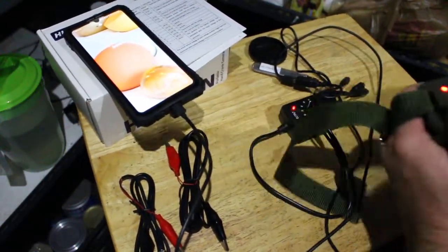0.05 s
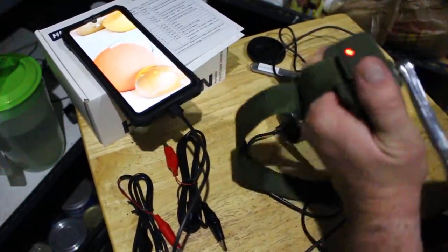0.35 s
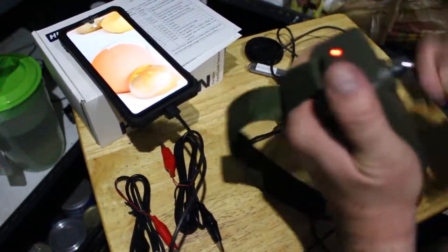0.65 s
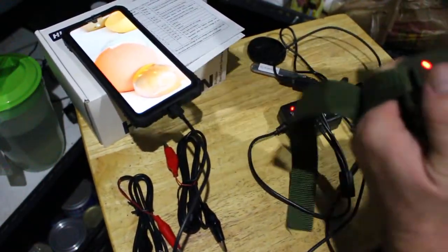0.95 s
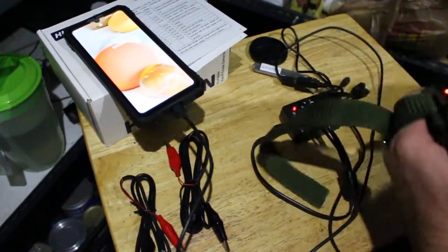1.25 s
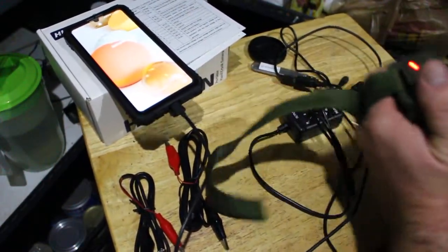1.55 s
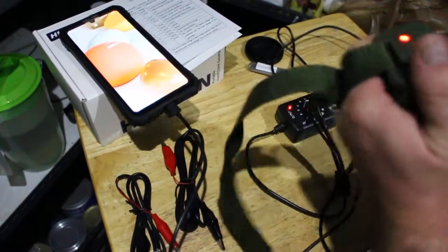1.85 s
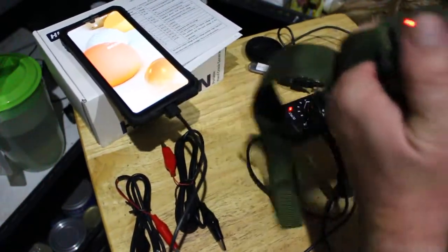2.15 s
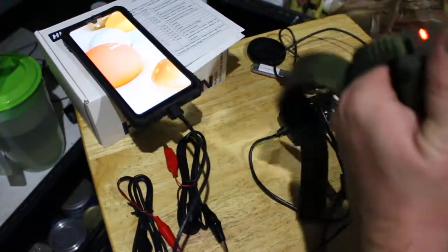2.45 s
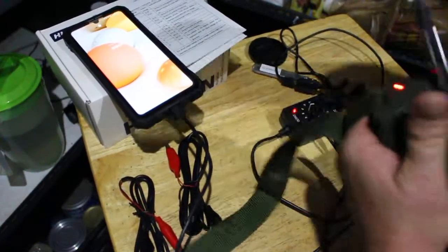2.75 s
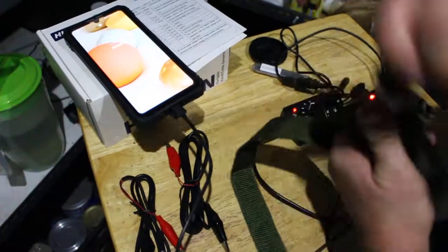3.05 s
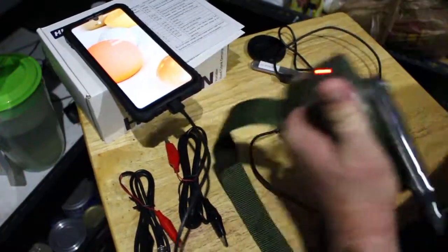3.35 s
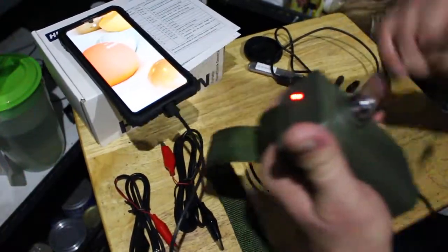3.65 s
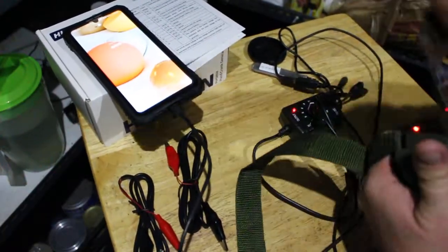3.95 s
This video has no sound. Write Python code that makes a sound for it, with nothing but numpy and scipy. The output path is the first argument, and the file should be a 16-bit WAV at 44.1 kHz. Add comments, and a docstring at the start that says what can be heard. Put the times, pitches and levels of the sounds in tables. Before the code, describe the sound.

A hand-cranked generator whirs and rattles, its gear whine rising and falling with each turn.

```python
"""A small room, a wooden table, a hand-held crank generator turned over it close to a stereo microphone.
Each push speeds the gears up: the meshing teeth whine and rattle in the casing, squeal briefly, mostly
as they coast, and go slack between pushes. Underneath lie a faint drone, a steady room hum and one soft
bump of the casing. The generator sits a little to the right, with quick reflections off the table."""
import sys
import numpy as np
from scipy import signal
from scipy.fft import rfft, irfft
from scipy.io import wavfile

SR = 44100
rng = np.random.default_rng(int(sys.argv[2]) if len(sys.argv) > 2 else 0)


def output_pcm(signal):
    """Save a mono or channel-first signal as 16-bit PCM at the path in sys.argv[1].

    Samples are clipped to [-1, 1] before scaling.
    """
    pcm = np.clip(np.atleast_2d(signal).T, -1, 1) * 32767
    wavfile.write(sys.argv[1], SR, np.round(pcm).astype(np.int16))


N = 176400

# reflections against direct sound at the microphone (frequency [Hz], level [dB])
REFLECTIONS = [(40, -16), (200, -18.5), (1500, -6.5), (3000, -6.5), (4500, -10.5), (6500, -5.5),
               (12000, -6)]
# left channel minus right (frequency [Hz], level [dB])
STEREO_BALANCE = [(200, -1.8), (800, -3), (1600, -3), (2800, -4.5), (4500, -3.5), (6300, -4.5),
                  (8500, -2.3), (14000, 0.8)]
# colour of the low drone of casing and room (frequency [Hz], level [dB])
DRONE_COLOUR = [(20, -36), (30, -27), (45, -38), (70, -6.5), (100, -15), (150, 0), (200, -2), (280, -3),
                (400, -3.5), (600, -8.5), (850, -6), (1300, -10.5), (4000, -21), (15000, -56)]
# slow drift of the drone (time [s], level [dB])
DRONE_DRIFT = [(0, 5), (.45, 5), (.65, 1.5), (2.7, -1.5), (4, 2)]
# steady tones in the room (frequency [Hz], level [dB])
HUM_TONES = [(190, -58), (240, -59.5), (359, -57), (534, -61)]
# resonances of the casing (frequency [Hz], width [Hz], lift [dB])
CASING_MODES = [(1380, 112, 3), (2023, 235, 4.5), (2350, 200, -2), (2640, 340, 1), (3070, 240, 3),
                (3820, 210, 2), (4535, 94, 3.5), (5230, 130, 0.5)]
# turns of the crank (slowest at [s], tooth rate [Hz], fastest at [s], tooth rate [Hz],
# coasting shape [over 1 holds the speed longer], level [dB])
CRANK_TURNS = [(.024, 623, .241, 788, 1.48, 2), (.454, 692, .605, 826, 1.33, 1),
               (.833, 646, 1.023, 812, .96, 1), (1.244, 654, 1.387, 856, 1.06, 0),
               (1.611, 699, 1.737, 896, 1.25, -1), (1.968, 672, 2.109, 899, 1.19, -1),
               (2.336, 733, 2.463, 920, 1.25, -2), (2.691, 692, 2.804, 882, 1.51, -1),
               (3.064, 651, 3.195, 820, 1.55, 1), (3.447, 569, 3.607, 779, .94, 1),
               (3.915, 559, 4.09, 750, 1, 4)]
# moments when the teeth go slack (time [s], half length [s], level change [dB])
SLACK_MOMENTS = [(0.448, 0.018, -2.5), (0.711, 0.0068, -5), (0.79, 0.058, -2), (1.09, 0.0069, -7),
                 (1.2, .02, -0.5), (1.614, 0.015, -0.5), (1.937, .045, 0), (2.31, 0.02, 1.5),
                 (2.598, 0.078, -2), (2.978, 0.029, -11), (3.372, 0.035, -21.5), (3.81, 0.033, -6.5),
                 (3.896, 0.045, -6)]
# squeals (time [s], half length [s], harmonic [x tooth rate], level [dB], roughness [rad])
SQUEAL_BURSTS = [(0.064, 0.032, 5, -19.5, 0.31), (0.278, 0.009, 5, -13.5, 0.39), (0.36, .03, 5, -22.5, 0.4),
                 (.55, 0.03, 4, -25, 0.32), (0.644, 0.017, 5, -15.5, .6), (0.681, 0.007, 5, -13.5, 0.92),
                 (.9, 0.042, 3, -30, .3), (1.049, 0.027, 5, -16.5, 0.4), (1.126, .018, 5, -18, 0.69),
                 (1.24, 0.038, 3, -28.5, 0.18), (1.354, 0.014, 4, -17.5, 0.74),
                 (1.414, 0.014, 5, -16.5, .9), (1.456, 0.017, 5, -19.5, 1.6), (1.768, 0.013, 5, -16, 0.62),
                 (1.83, .018, 5, -18.5, 1.6), (2.141, .03, 3, -18.5, 0.27), (2.186, 0.034, 4, -20, .5),
                 (2.278, 0.011, 5, -18, .5), (2.458, .005, 5, -16, .5), (2.497, .03, 3, -23.5, 0.22),
                 (2.516, 0.017, 5, -14, 0.44), (2.845, 0.038, 5, -16, 1.25), (3.019, 0.0087, 5, -24, .4),
                 (3.223, 0.035, 5, -14.5, .7), (3.643, 0.034, 5, -15, 0.85), (3.702, 0.014, 5, -17.5, 1.15),
                 (3.85, .02, 6, -28, .6), (3.99, 0.018, 5, -16, 0.47)]
# colour of the tooth rattle (frequency [Hz], level [dB])
RATTLE_COLOUR = [(300, -31), (1000, -21.5), (1400, -13), (2100, -13), (2900, -4.5), (3900, -2), (5000, 0),
                 (6100, -3), (7200, -9), (8800, -18), (10900, -17), (12200, -27), (13500, -31),
                 (15500, -48)]
# each channel's own rattle against the rattle common to both (frequency [Hz], level [dB])
RATTLE_SPREAD = [(1000, -25), (2500, 5.5), (4500, 2.5), (6500, 11), (12000, -18)]
# harmonics of the whine (harmonic [x tooth rate], level pushing [dB], level coasting [dB])
MESH_HARMONICS = [(1, -17.5, -22.5), (2, -5.5, -3.5), (3, 3, -3), (4, 4.5, -6), (5, 3.5, 4.5), (6, 4, 2),
                  (7, 6, 3), (8, 4, 0), (9, 9, -5.5), (10, 3.5, -3), (11, 11, -29)]
# side tones of the pinion (harmonic [x shaft rate], level [dB])
PINION_TONES = [(11, -22.5), (13, -17.5), (19, -20), (20, -17.5), (27, -11), (28, -15), (36, -10)]
# the casing radiates the bottom and top of the whine poorly (frequency [Hz], level [dB])
WHINE_RADIATION = [(700, -6), (870, 0), (5800, -1.5), (6500, -8), (7100, -21.5), (9000, -20)]

PINION_TEETH, USUAL_TOOTH_HZ = 8, 833.2
WHINE_DB, WHINE_DB_PER_OCT, FLUTTER_DB, FLUTTER_HZ = -29.5, 20.5, 5, 28.6
WOBBLE_TEETH, PUSH_JITTER_TEETH, COAST_JITTER_TEETH, JITTER_HZ = .027, .014, .019, 178
RATTLE_DB, RATTLE_DB_PER_OCT, RATTLE_COAST_DB, SCATTER_DB, CONTACT_TEETH = -26, 12, 2, 2.6, .55


def undb(db):
    """Decibels to gain."""
    return 10 ** (np.asarray(db) / 20)


def unit(x):
    """Scale to rms 1."""
    return x / np.sqrt(np.mean(x ** 2))


def bins():
    """Frequencies of the spectrum in Hz, floored at 1."""
    return np.maximum(np.arange(N // 2 + 1) * SR / N, 1)


def curve(points, hz):
    """Read (frequency [Hz], level [dB]) points on a log-frequency axis."""
    f, db = np.array(points).T
    return np.interp(np.log(hz), np.log(f), db)


def colour(x, db):
    """Filter by a gain in dB for each frequency."""
    return irfft(rfft(x) * undb(db), N)


def walk(width_hz, centre_hz=0):
    """Smooth random motion of rms 1, within about width_hz of centre_hz."""
    return unit(irfft(rfft(rng.standard_normal(N)) / (1 + ((bins() - centre_hz) / width_hz) ** 4), N))


def swell(t, at, half):
    """A bell-shaped rise and fall."""
    return np.exp(-((t - at) / half) ** 2)


def room(channels, t, t60_s=.26, table_decay_s=.006, tail_gain=.86, left_lag_ms=.024):
    """The microphone hears direct sound from a little to the right, the table top and a short tail."""
    f, out = bins(), []
    wet = undb(curve(REFLECTIONS, f))
    decay = np.exp(-t / table_decay_s) + tail_gain * np.exp(-np.log(1000) * t / t60_s)
    for channel, side, lag_ms in zip(channels, (1, -1), (left_lag_ms, 0)):
        echo = decay * rng.standard_normal(N)
        direct = np.exp(-2j * np.pi * f * lag_ms / 1000)
        path = (direct + wet * rfft(echo) / np.linalg.norm(echo)) / np.hypot(1, wet)
        balance = undb(side * curve(STEREO_BALANCE, f) / 2)
        response = np.roll(irfft(path * balance, N), N // 2)
        out.append(signal.fftconvolve(channel, response)[N // 2:N // 2 + N])
    return np.array(out)


def drone(t, base_db=-48.5):
    """Casing and room drone faintly: low noise that drifts in level."""
    noise = unit(colour(rng.standard_normal(N), curve(DRONE_COLOUR, bins())))
    return noise * undb(base_db + np.interp(t, *np.array(DRONE_DRIFT).T))


def hum(t):
    """Steady tones in the room, each wandering a little in phase."""
    return sum(undb(db) * np.sin(2 * np.pi * f * t + .5 * walk(3.2)) for f, db in HUM_TONES)


def bump(t, at_s=.445, decay_s=.013, gain_db=-46):
    """One soft knock on the casing: a low band of noise swells and dies."""
    age = np.maximum(t - at_s, 0) / decay_s
    return undb(gain_db) * walk(width_hz=41, centre_hz=136) * np.sqrt(age) * np.exp(1 - age)


def casing(hz):
    """Lift in dB from the resonances of the casing."""
    return sum(db / (1 + (2 * (hz - f) / width) ** 2) for f, width, db in CASING_MODES)


def crank(t, push_shape=1.25, load_lead_s=.005):
    """The hand pushes, the gears coast: tooth rate in Hz, push (1 pushing, 0 coasting), level in dB."""
    turns = np.array(CRANK_TURNS)
    times, rates = turns[:, [0, 2]].ravel(), turns[:, [1, 3]].ravel()
    shapes = np.c_[np.full(len(turns), push_shape), turns[:, 4]].ravel()
    stage = np.interp(t, times, np.arange(len(times)))  # even stages push, odd ones coast
    i = np.minimum(stage.astype(int), len(times) - 2)
    ease = np.sin(np.pi / 2 * (stage - i) ** shapes[i]) ** 2
    tooth_hz = rates[i] + (rates[i + 1] - rates[i]) * ease
    load_stage = np.interp(t + load_lead_s, t, stage)
    push = .5 + .5 * np.tanh(2 * np.sin(np.pi * load_stage))
    return tooth_hz, push, np.interp(t, turns[:, 2], turns[:, 5])


def squeals(t, teeth, rough_hz=235):
    """Short, rough squeals on single harmonics, mostly just after the speed peaks, as the gears coast."""
    flutter, shake = undb(2 * walk(rough_hz)), walk(rough_hz)
    return flutter * sum(undb(db) * swell(t, at, half) * np.sin(2 * np.pi * k * teeth + rough * shake)
                         for at, half, k, db, rough in SQUEAL_BURSTS)


def rattle(tooth_hz, push, teeth):
    """Each tooth strikes with its own force and scrapes; looser when coasting, spread over the casing."""
    f = bins()
    force = undb(SCATTER_DB * np.minimum(rng.standard_normal(N), 1))[np.abs(teeth).astype(int)]
    contact = np.exp(-(teeth % 1) / CONTACT_TEETH)
    common, *sides = force * contact * np.tanh(rng.standard_normal((3, N)))
    spread_db = curve(RATTLE_SPREAD, f)
    tone_db = curve(RATTLE_COLOUR, f) + casing(f) - 20 * np.log10(np.hypot(1, undb(spread_db)))
    scrapes = unit(colour(common, tone_db) + colour(np.array(sides), tone_db + spread_db))
    treble = colour(scrapes, curve([(5500, -30), (8000, 0)], f))
    body = (scrapes - treble) * undb(walk(33))  # body and treble flicker apart
    treble *= undb(2 * walk(21) + 2 * (.5 - push))  # brighter when coasting
    speed_db = RATTLE_DB_PER_OCT * np.log2(tooth_hz / USUAL_TOOTH_HZ)
    return (body + treble) * undb(RATTLE_DB + speed_db + RATTLE_COAST_DB * (1.5 - push))


def whine(tooth_hz, push, teeth):
    """Meshing teeth and pinion sing through the casing: cleaner on the push, rasping after it."""
    tones = [(k, coasting + (pushing - coasting) * push) for k, pushing, coasting in MESH_HARMONICS]
    tones += [(k / PINION_TEETH, db) for k, db in PINION_TONES]
    jitter = PUSH_JITTER_TEETH * push + COAST_JITTER_TEETH * (1 - push)
    out = 0
    for k, db in tones:
        phase = 2 * np.pi * (k * (teeth + jitter * walk(JITTER_HZ)) + rng.random())
        body_db = casing(k * tooth_hz) + curve(WHINE_RADIATION, k * tooth_hz)
        flutter_db = FLUTTER_DB * (1 + 1 / k) * np.minimum(walk(FLUTTER_HZ), 1)
        out = out + undb(db + body_db + flutter_db) * np.sin(phase)
    return out * undb(WHINE_DB + WHINE_DB_PER_OCT * np.log2(tooth_hz / USUAL_TOOTH_HZ))


def scene():
    """Close up, the crank drives whine, rattle and squeals; whine and rattle dip as the teeth go slack."""
    t = np.arange(N) / SR
    tooth_hz, push, turn_db = crank(t)
    teeth = np.cumsum(tooth_hz) / SR + WOBBLE_TEETH * walk(40)  # running count of teeth passed
    slack_db = sum(db * swell(t, at, half) for at, half, db in SLACK_MOMENTS)
    gears = whine(tooth_hz, push, teeth) + rattle(tooth_hz, push, teeth)
    shudder_db = .78 * walk(18)
    gears *= undb(turn_db + slack_db + shudder_db)
    return room(gears + squeals(t, teeth) + drone(t) + hum(t) + bump(t), t)


def record(dry):
    """The recorder cuts the top steeply above 15650 Hz."""
    return signal.sosfilt(signal.ellip(8, .2, 80, 15650, fs=SR, output="sos"), dry)


dry = scene()
out = record(dry)
output_pcm(out)
```